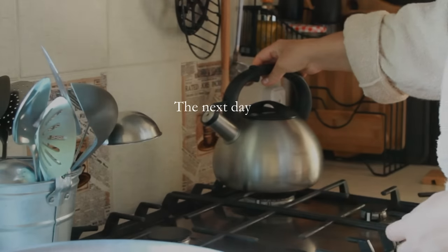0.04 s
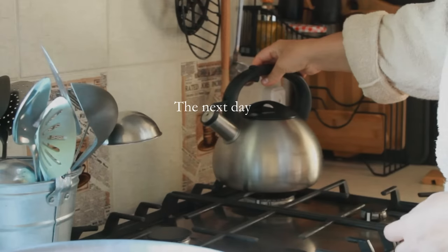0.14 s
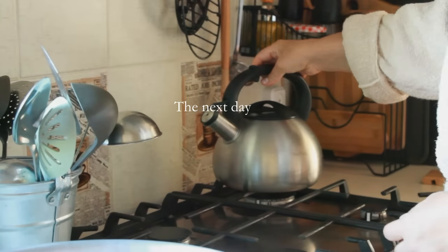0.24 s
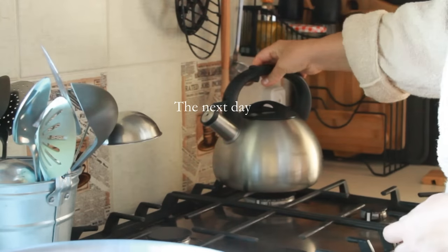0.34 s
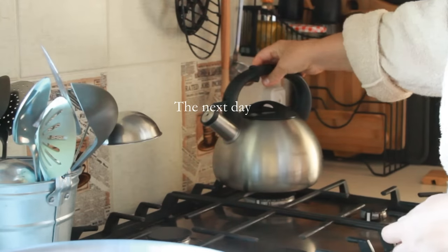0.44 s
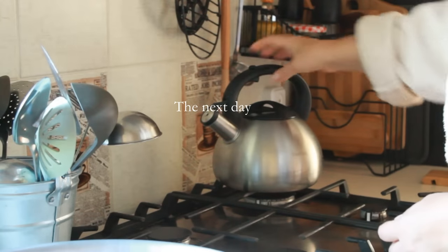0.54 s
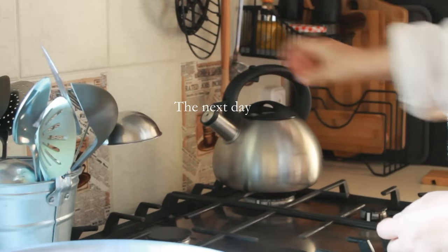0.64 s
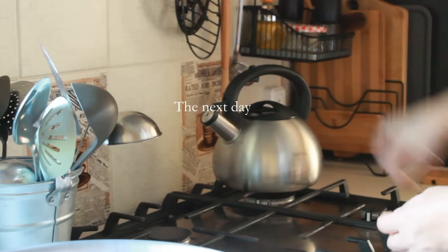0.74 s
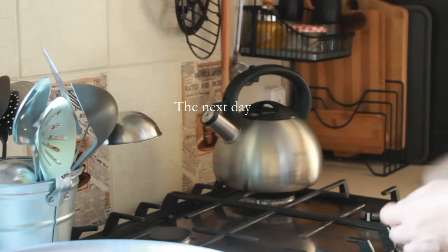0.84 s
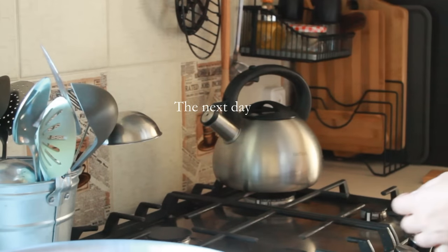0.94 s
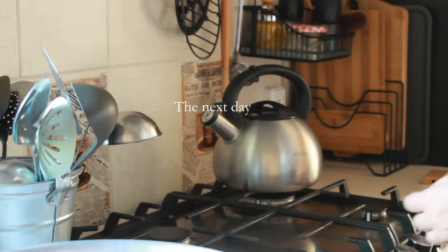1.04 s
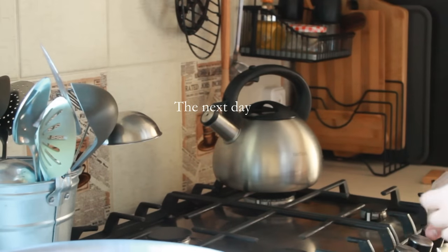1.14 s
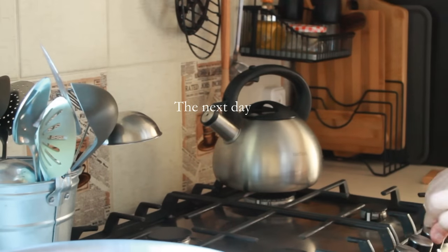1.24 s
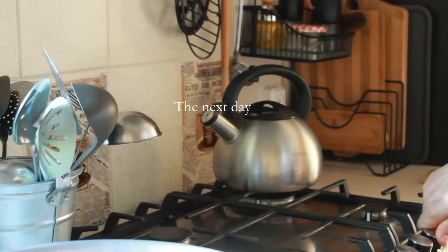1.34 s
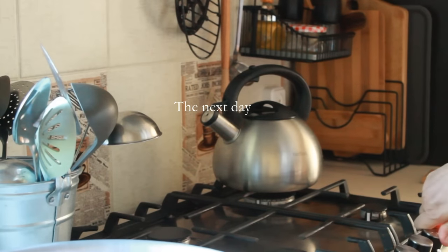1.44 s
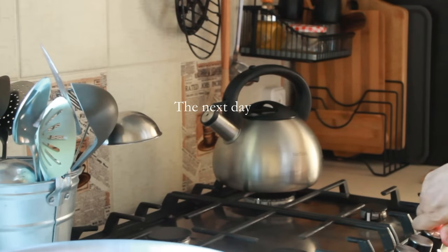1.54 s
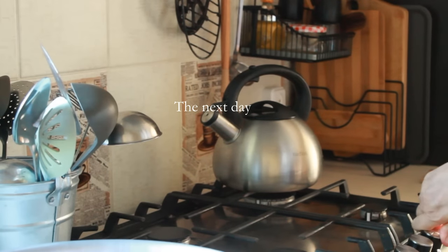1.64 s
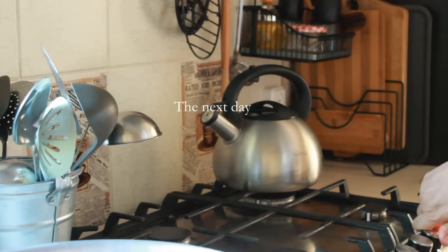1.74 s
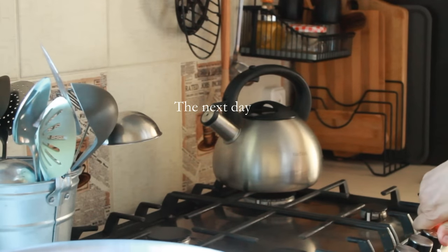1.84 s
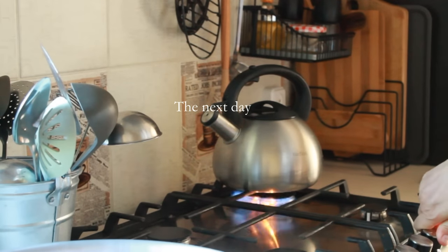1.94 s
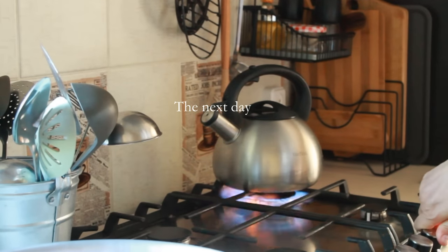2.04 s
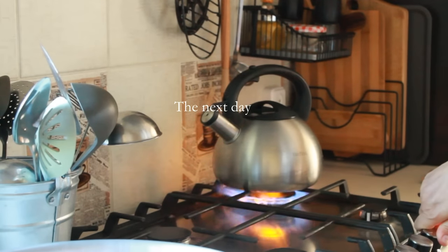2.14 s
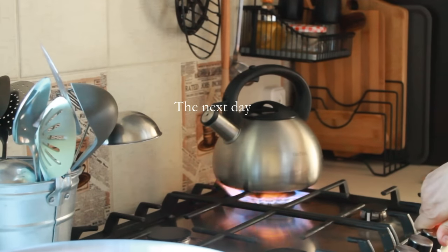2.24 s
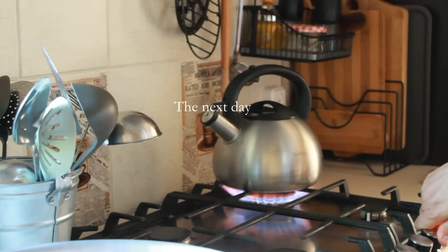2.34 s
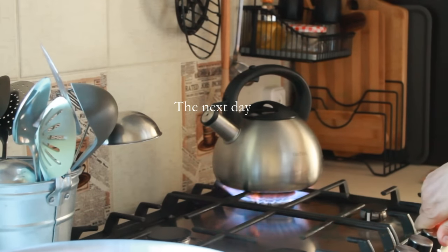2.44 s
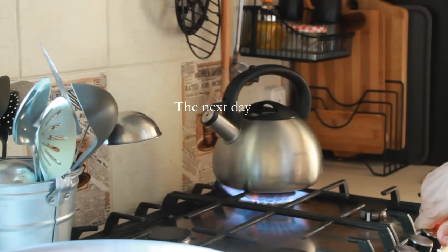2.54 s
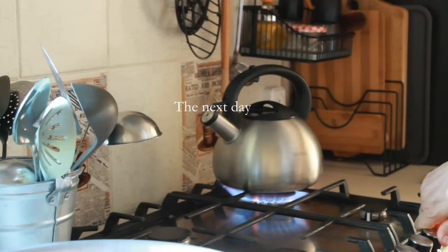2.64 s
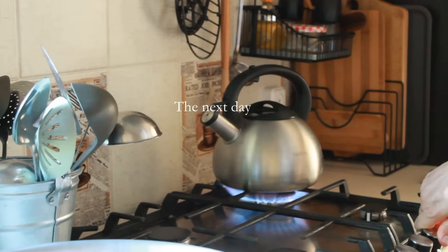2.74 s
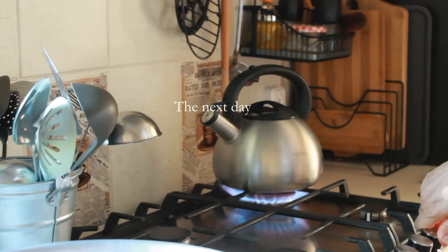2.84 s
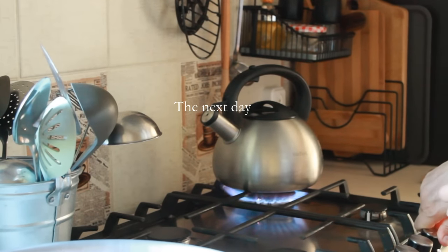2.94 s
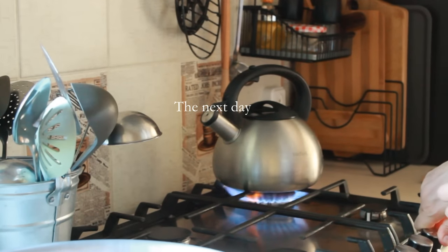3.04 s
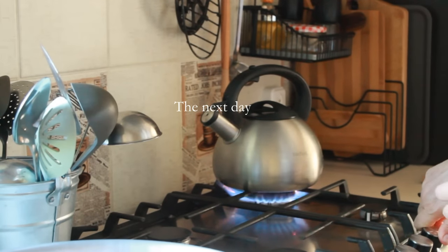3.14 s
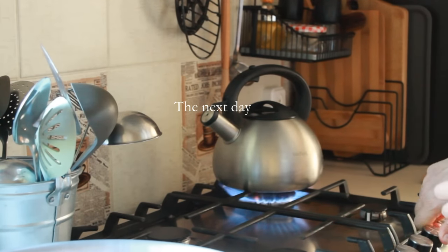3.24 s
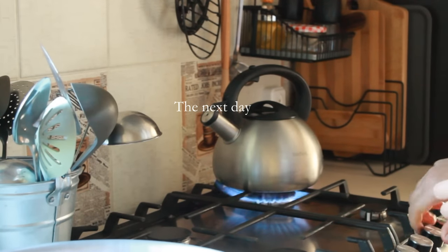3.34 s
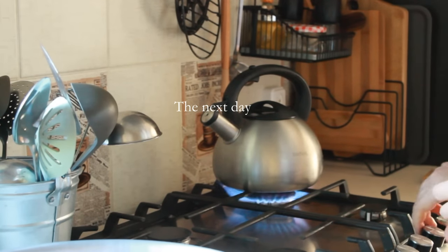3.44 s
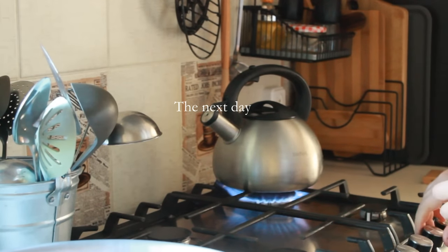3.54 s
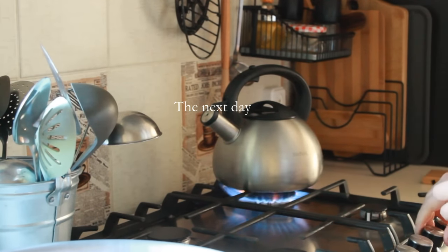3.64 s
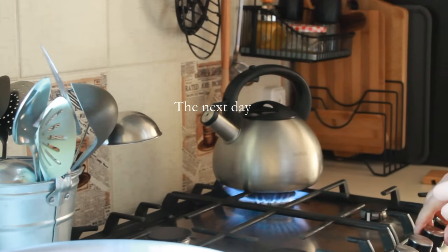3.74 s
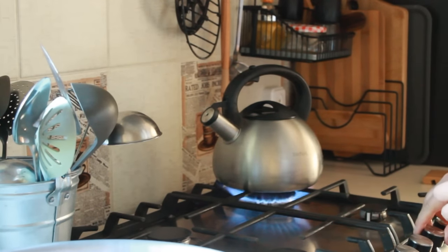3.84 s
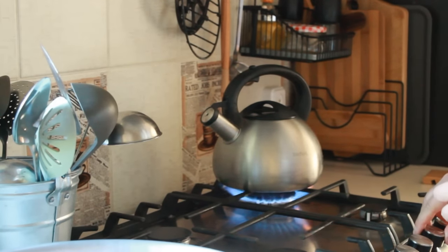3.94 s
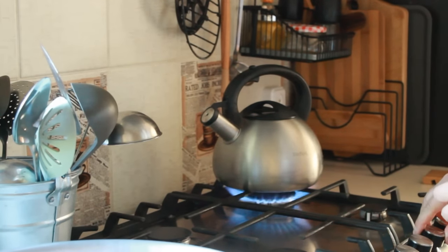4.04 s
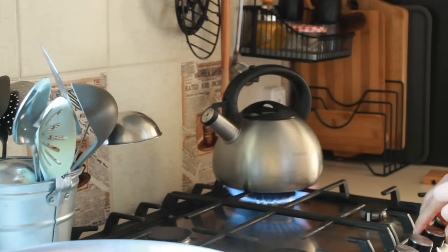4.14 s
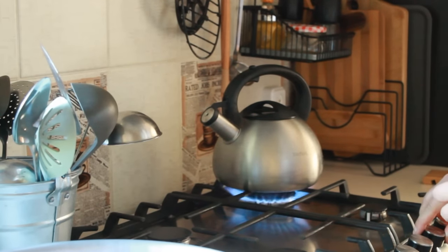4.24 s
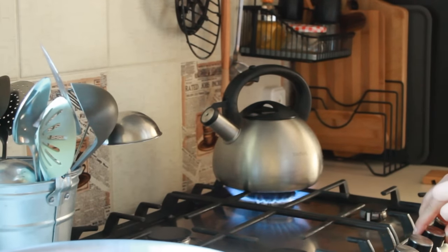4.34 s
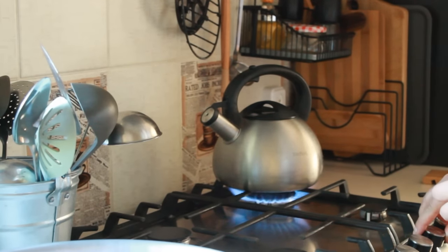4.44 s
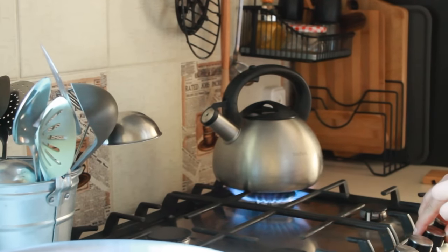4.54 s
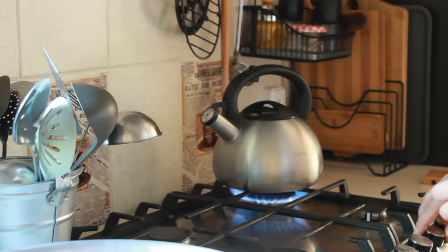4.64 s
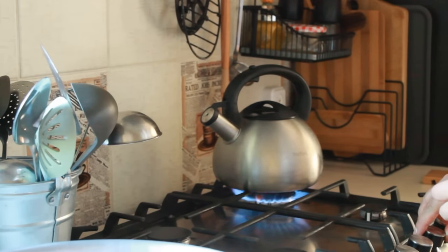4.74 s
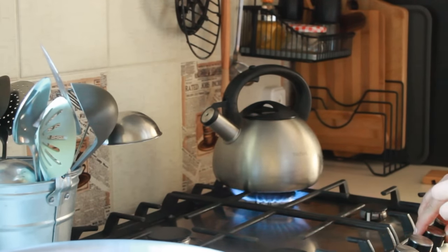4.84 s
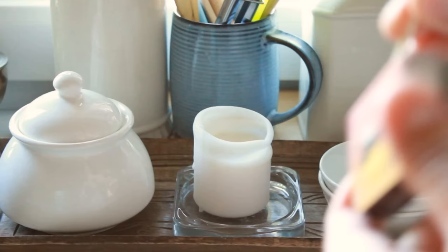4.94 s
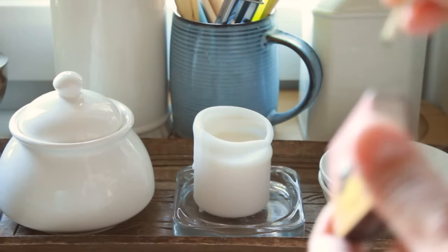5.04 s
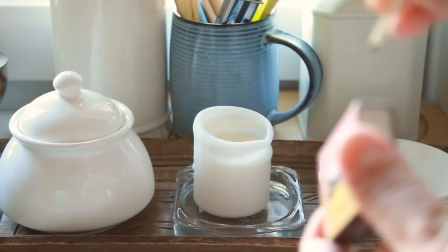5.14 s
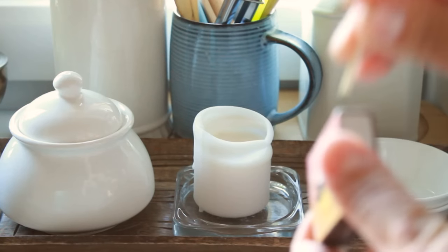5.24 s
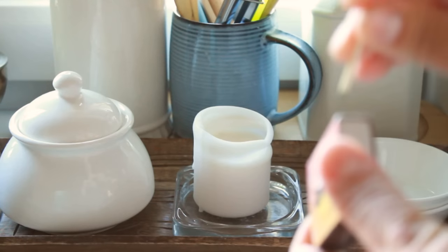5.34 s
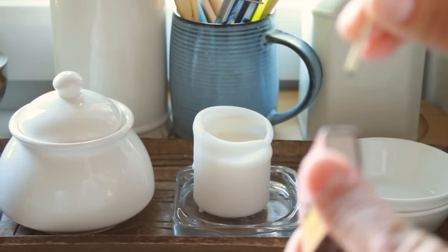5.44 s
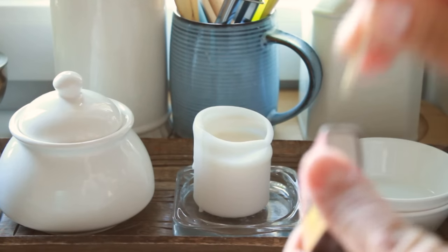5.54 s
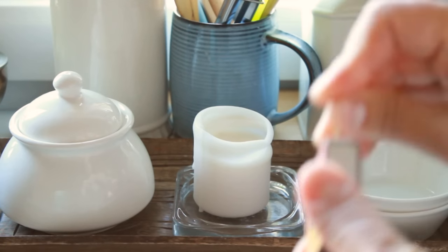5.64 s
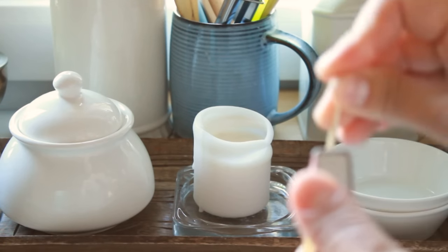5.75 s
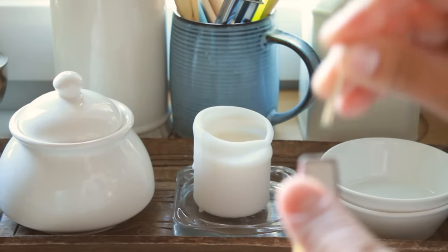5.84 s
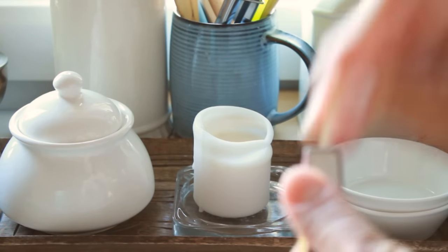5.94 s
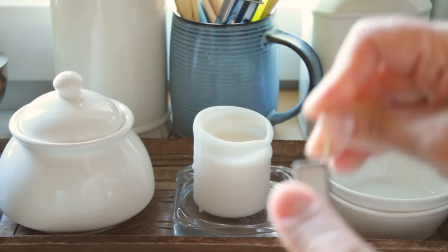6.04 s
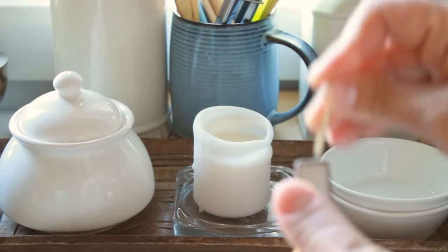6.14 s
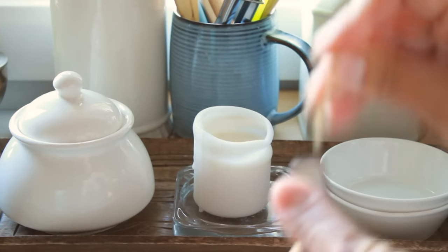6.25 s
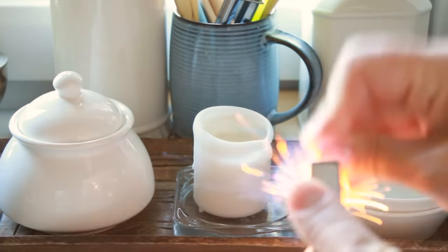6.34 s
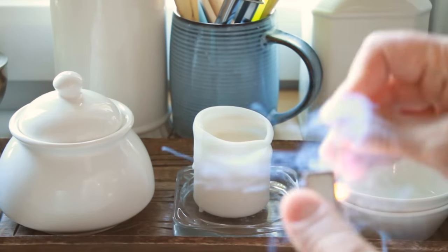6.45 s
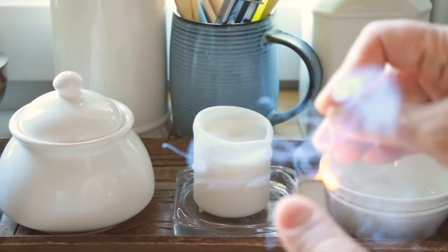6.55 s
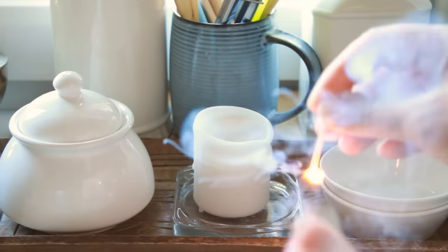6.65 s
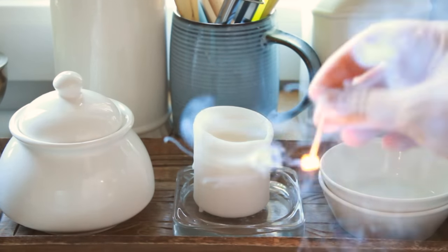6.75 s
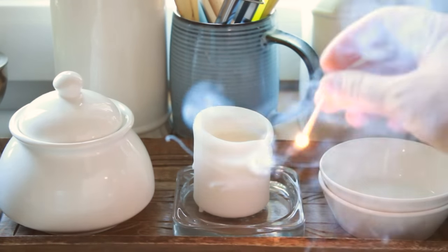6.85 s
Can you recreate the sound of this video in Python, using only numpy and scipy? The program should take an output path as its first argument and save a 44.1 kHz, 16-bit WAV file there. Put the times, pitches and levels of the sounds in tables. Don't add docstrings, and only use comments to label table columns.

```python
import sys
import numpy as np
from scipy import signal
from scipy.fft import rfft, irfft, next_fast_len
from scipy.io import wavfile
from scipy.ndimage import uniform_filter1d, map_coordinates

SR = 44100
rng = np.random.default_rng(int(sys.argv[2]) if len(sys.argv) > 2 else 0)


def bounce(signal):
    frames = np.transpose(np.atleast_2d(signal))
    limited = np.clip(frames, -1, 1)
    pcm = np.round(limited * 32767).astype(np.int16)
    wavfile.write(sys.argv[1], SR, pcm)


def gain_from_db(level_db):
    decades = np.asarray(level_db, float) / 20
    return 10 ** decades


N = 303849
TIME = np.arange(N) / SR
CUT_S = 4.981

# (spectrum of f/Hz, level/dB per Hz), overall level/dB
STOVE_AIR = [(15, -54), (25, -24), (55, -7.5), (92, -24), (138, -7.5), (378, -14), (445, -8.5),
             (651, -12.5), (726, -14), (1010, -10.5), (5570, -19.5), (16500, -35)], -68.5
# f/Hz, level/dB per Hz
TABLE_AIR = [(15, -43), (25, -12), (59, -3), (77, -14), (96, -17), (129, -5.5), (253, -6), (340, 0),
             (378, -4.5), (945, -8), (1200, -11), (7910, -21.5), (15500, -49.5)]
# t/s, level/dB
FRIDGE_HUM = [
    (4.99, -72),
    (5.86, -63),
    (6.084, -63.5),
    (6.63, -55.5),
    (6.704, -65),
    (6.89, -64),
]
# f/Hz, T60/s
WALLS = [(300, 0.83), (1300, 0.54), (3500, 0.57), (9000, 0.4), (15000, 0.27)]

# f/Hz, level/dB, nominal T60/s (capped at 0.3 s and broadened in use)
SHELL_MODES = [(2207, 2, 0.64), (2374, -5, 1.5), (2640, -3, 0.074), (2900, -14, 0.63), (3184, 3, 0.17),
               (3540, 4.5, 0.22), (3595, 9, 0.2), (4027, 5.5, 0.23), (4610, 8.5, 0.16), (5140, -13, 0.6),
               (5469, -21, 5.0), (5480, 3, 0.22), (5840, -3, 0.31), (6300, -3, 0.49), (6300, -11, 0.27),
               (6830, 1, .3), (7628, -28, 5.0), (7840, 7.5, 0.21), (8436, -22, 0.26), (8840, -0.5, 0.16),
               (9350, -1, 0.42), (10200, -14, 0.15)]
# f/Hz, level/dB per Hz
BOOM_SPECTRUM = [(24, -47), (40, -16), (234, -6), (308, -15.5), (393, -1.5), (459, -13.5), (500, -2.5),
                 (595, -12), (870, -5), (1230, -11.5), (1340, -4), (1570, -15), (2500, -19), (3250, -28),
                 (5500, -120)]
# f/Hz, level/dB per Hz
CLATTER_SPECTRUM = [(710, -35), (1200, -12), (1340, -21), (1520, -24), (7410, -15.5), (7910, -23),
                    (16000, -40)]
# t/s, level/dB over the chatter
REHITS = [
    (0.013, 1),
    (0.029, 3),
    (0.071, -2),
    (0.099, 9),
    (.137, 11),
    (.19, 7),
]

# t/s, level/dB, centre f/Hz, T60/s
RUBS = [
    (.36, -63.5, 120, .21),
    (.42, -55.5, 900, .35),
    (0.551, -62, 55, .52),
    (.605, -58.5, 5000, 0.34),
    (.97, -58, 140, 0.091),
    (1.25, -64, 130, 0.28),
    (5.3, -55, 100, .1),
    (5.87, -46.5, 170, 0.3),
    (5.98, -53, 220, .13),
]
# t/s, level/dB, centre f/Hz, T60/s
TICKS = [
    (.541, -49, 460, 0.19),
    (.547, -60, 1400, .12),
    (.704, -56.5, 4200, .06),
    (.758, -67, 8000, .015),
    (1.248, -57, 456, 0.25),
    (1.277, -67, 8500, .06),
    (1.281, -55.5, 2600, 0.13),
    (1.368, -59, 6300, .044),
    (1.38, -57.5, 500, 0.074),
    (6.7, -44, 450, .046),
]

# t/s, level/dB
GAS_FLOW = [
    (1.239, -80),
    (1.398, -75),
    (1.45, -66),
    (2.001, -62),
    (4.401, -61.5),
    (4.982, -66.5),
]
# f/Hz, width/Hz, level/dB
PORT_MODES = [(1285, 77, -5.5), (3284, 31, 2.5), (4025, 54, -6.5), (4930, 62, -3), (6560, 87, -14),
              (8790, 45, -11), (8970, 50, -17.5), (9790, 42, -17), (10800, 40, -8.5), (11170, 22, -13),
              (11470, 23, -8.5), (13100, 60, -14), (14150, 83, -17), (15300, 69, -15.5)]
# f/Hz, level/dB per Hz
JET_SPECTRUM = [(400, -45), (750, -16), (1050, -7), (1450, 4.5), (1750, -29), (2400, -29), (3300, -15),
                (5000, -21.5), (7000, -10.5), (8300, -19), (11000, -16), (12300, -21), (15500, -19.5)]
# t/s, level/dB
FLAME = [
    (2.3, -72),
    (2.75, -66),
    (3.5, -67.5),
    (3.8, -74.5),
    (4.4, -74.5),
    (4.98, -95),
]
# f/Hz, level/dB per Hz
ROAR_SPECTRUM = [(30, -24), (90, -11.5), (190, -5), (330, 0), (600, -6.5), (950, -7.5), (1500, -13.5),
                 (3000, -25), (6000, -62)]
# t/s, level/dB, width/s
PUFFS = [
    (2.055, -53, 0.019),
    (2.085, -49.5, 0.02),
    (2.155, -58, 0.018),
    (2.19, -52, 0.019),
]

# t/s, peak level/dB
SPARKS = [
    (1.63, -17),
    (1.9889, -15.5),
    (2.348, -17.5),
    (2.7076, -17.5),
    (3.0516, -18),
]
# f/Hz, level/dB per Hz
SPARK_SPECTRUM = [(290, -52.5), (500, -26), (1170, -15.5), (1330, -11.5), (1770, -16), (3900, -5),
                  (5350, -5), (7670, 1), (10100, -1), (15500, -13)]

# t/s, level/dB
TAP = (4.982, -41.5)
# f/Hz, level/dB per Hz
TAP_SPECTRUM = [(240, -44), (400, -18), (1310, -10.5), (1630, -4), (2550, -6.5), (2800, -2), (3310, -14),
                (4580, -8), (16000, -38)]
# t/s, length/s, landing level/dB, drag level/dB, drag change to the end/dB
STROKES = [
    (5.649, 0.058, -16, -29, -4.5),
    (6.013, 0.059, -25.5, -28, 1.4),
    (6.3549, .05, -24.5, -28.5, 4),
]
# f/Hz, level/dB per Hz
BOX_SPECTRUM = [(400, -37.5), (900, -27), (1200, -7), (1520, 2), (1900, -6.5), (2500, -7.5), (2950, -12),
                (3550, -18.5), (4400, -11.5), (6000, -18), (7900, -16), (9500, -26.5), (12000, -33.5),
                (16000, -30)]
# f/Hz, width/Hz
BOX_MODES = [(1224, 23), (1394, 19), (1507, 26), (1620, 25), (1787, 21), (1987, 27), (2190, 22), (2350, 20),
             (2540, 29), (2906, 24), (3390, 27), (3800, 21), (4230, 60), (4580, 42)]

# t/s, level/dB, attack/s, hold/s, fall/(dB/s)
FLARE = (6.381, -26, .005, .016, 520)
# f/Hz, level/dB per Hz
FLARE_SPECTRUM = [(59, -59), (100, -17), (427, -2.5), (903, -7.5), (1610, -14), (1790, -2), (2030, -4.5),
                  (4390, -3), (14800, -17.5), (16500, -27)]
# t/s, level/dB, attack/s, hold/s, fall/(dB/s)
SPUTTER = (6.415, -44, .01, .002, 75)
# f/Hz, level/dB per Hz
SPUTTER_SPECTRUM = [(470, -26), (800, -5), (1300, -3.5), (1430, -0.5), (2050, -0.5), (4540, -1.5),
                    (7550, -6.5), (15500, -29)]
# t/s, level/dB, width/s
SPITS = [
    (6.643, -54, .005),
    (6.755, -51, .012),
    (6.86, -50.5, .011),
]

THIN_INSTANTS = [.421, .909, 1.187, 1.304, 1.861, 2.186, 2.395, 2.929, 3.416, 3.533, 3.741, 3.858, 3.881,
                 3.904, 3.974, 4.02, 4.09, 4.113, 4.299, 4.392, 4.717, 4.856, 5.947, 6.064, 6.319, 6.574]


def unit(x):
    return x / np.sqrt(np.mean(x ** 2) + 1e-20)


def along(points, hz):
    f, v = np.transpose(points)
    return np.interp(np.log(hz + 1), np.log(f + 1), v)


def gain(rows):
    s, db = np.transpose(rows)
    return gain_from_db(np.interp(TIME, s, db)) * (TIME >= s[0]) * (TIME <= s[-1])


def envelope(start_s, db, attack_s, hold_s, fall):
    t = TIME - start_s
    decay = gain_from_db(db - fall * np.maximum(t - attack_s - hold_s, 0))
    return decay * np.clip(t / attack_s, 0, 1)


def swells(rows):
    return sum(gain_from_db(db) * np.exp(-((TIME - s) / width) ** 2) for s, db, width in rows)


def wobble(rate):
    knots = rng.standard_normal(int(N * rate / SR) + 4)
    return map_coordinates(knots, [TIME * rate])


def filtered(x, response):
    m = next_fast_len(len(x) + SR // 2)
    return irfft(rfft(x, m) * response(np.fft.rfftfreq(m, 1 / SR)), m)[:len(x)]


def causal(spectrum):
    cepstrum = irfft(np.log(gain_from_db(along(spectrum, np.fft.rfftfreq(4096, 1 / SR))) + 1e-6))
    cepstrum[1:2048] *= 2
    cepstrum[2049:] = 0
    kernel = irfft(np.exp(rfft(cepstrum)))[:2048]
    return kernel / np.linalg.norm(kernel)


def resonances(peaks, widen):
    def response(f):
        total = 0
        for k, (centre, width, db) in enumerate(peaks):
            damping = 1j * f * widen * width
            total = total + (-1) ** k * gain_from_db(db) * damping / (centre * centre - f * f + damping)
        return total
    return response


def noise(spectrum):
    return unit(filtered(rng.standard_normal(N), lambda hz: gain_from_db(along(spectrum, hz))))


def grit(per_s, spread_db):
    slips = (rng.random(N) < per_s / SR) * rng.standard_normal(N)
    slips = slips * gain_from_db(spread_db * rng.exponential(size=N))
    power = np.abs(uniform_filter1d(slips ** 2, size=900))
    return slips / np.sqrt(power + .1 * power.mean())


def room(x, shorter=0.8):
    hz, t, z = signal.stft(rng.standard_normal(SR // 2), SR, nperseg=256)
    decay = gain_from_db(-60 * t / (shorter * along(WALLS, hz))[:, None])
    tail = signal.istft(z * decay, SR, nperseg=256)[1]
    delayed = np.pad(x, (120, 0))
    return signal.fftconvolve(delayed, tail / np.linalg.norm(tail))[:len(x)]


def air():
    hum_hz = 64.7 + 2.1 * wobble(8.6)
    hum = np.sqrt(2) * np.sin(2 * np.pi * np.cumsum(hum_hz) / SR)
    stove_spectrum, stove_db = STOVE_AIR
    stove = gain_from_db(stove_db + 0.38 * wobble(3.98)) * noise(stove_spectrum) * (TIME < CUT_S)
    table_db = -62 + 1.74 * (TIME - CUT_S)
    table = gain_from_db(table_db + 3.0 + 0.9 * wobble(8)) * noise(TABLE_AIR) * (TIME >= CUT_S)
    return stove + table + gain(FRIDGE_HUM) * hum


def kettle():
    land_s, still_s = 0.0102, 0.2
    landing = envelope(land_s, -33.5, 0.0017, 0.0047, 460)
    chatter = envelope(land_s, -51.5, .001, 0.14, 200)
    contact = landing + chatter
    boom = envelope(land_s, -42, 0.007, 0.051, 48)
    boom = boom * gain_from_db(-270 * np.maximum(TIME - still_s, 0))
    strikes = 1 + sum(gain_from_db(db) * np.exp(-np.abs(TIME - s) / 0.0048) * (TIME > s) for s, db in REHITS)
    shell = resonances([(hz, 2.2 / min(t60, .3), db) for hz, db, t60 in SHELL_MODES], widen=4.)
    force = grit(2500, spread_db=1.0)[:SR]
    ring = filtered(force * (contact * strikes)[:SR], shell) / np.std(filtered(force, shell))
    clatter = gain_from_db(-9.5) * contact * strikes * noise(CLATTER_SPECTRUM)
    dry = (clatter + boom * noise(BOOM_SPECTRUM))[:SR] + gain_from_db(-7.0) * ring
    return np.pad(dry + gain_from_db(-3.5) * room(dry), (0, N - SR))


def hands():
    out, t = np.zeros(N), np.arange(SR // 2) / SR
    touches = [(*r, 0.086) for r in RUBS] + [(*r, 0.036) for r in TICKS]
    for s, db, hz, t60, rise in touches:
        band = resonances([(hz, hz, 0)], widen=1.1)
        puff = unit(filtered(filtered(rng.standard_normal(len(t)), band), band))
        shape = gain_from_db(db - 60 * t / t60) * (1 - np.exp(-t / (rise * t60)))
        start = round(s * SR)
        out[start:][:len(t)] += (shape * puff)[:N - start]
    return out + gain_from_db(-4) * room(out)


def burner():
    light_s, hottest_s = 1.995, .22
    ports = unit(filtered(rng.standard_normal(N), resonances(PORT_MODES, widen=2.6)))
    jet = gain_from_db(1.0) * ports + gain_from_db(-1.5) * noise(JET_SPECTRUM)
    heat = np.maximum(TIME - light_s, 0) / hottest_s
    pitch_lift = .14 * (heat * np.exp(1 - heat)) ** 3
    jet = map_coordinates(jet, [np.cumsum(1 + pitch_lift + .003 * wobble(12))], order=5)
    flow = gain(GAS_FLOW) * gain_from_db(0.5 * wobble(7) + 0.77 * wobble(30))
    roar = unit(noise(ROAR_SPECTRUM) * gain_from_db(2.5 * wobble(40) + .8 * wobble(7)))
    whoosh = envelope(light_s, -52.5, .01, 0.21, 210)
    flame = whoosh + swells(PUFFS) + gain(FLAME)
    return flow * jet + flame * roar


def igniter():
    out, t = np.zeros(N), np.arange(SR // 2) / SR
    for s, db in SPARKS:
        pulse = (t == 0) * 1.
        cluster = (t / .001) ** 2 * np.exp(2 - 2 * t / .001) + .14 * gain_from_db(-60 * t / .08)
        echoes = pulse + cluster * rng.standard_normal(len(t)) + gain_from_db(19.0) * room(pulse)
        snap = signal.fftconvolve(echoes, causal(SPARK_SPECTRUM))[:len(t)]
        out[round((s + .0007) * SR):][:len(t)] += gain_from_db(db - 4.5) * snap
    return out


def below(x, hz):
    return filtered(x, lambda f: 1 / (1 + (f / hz) ** 6))


def box(force):
    modes = resonances([(hz, width, 0) for hz, width in BOX_MODES], widen=.8)
    body = signal.fftconvolve(force, causal(BOX_SPECTRUM))[:len(force)]
    return filtered(body, lambda f: 1 + np.abs(modes(f)))


def match():
    out = np.zeros(N)
    half = SR // 2
    slips = grit(5000, spread_db=1.5) * gain_from_db(1.8 * wobble(150))
    for s, length, land_db, drag_db, change_db in STROKES:
        span = slice(round(s * SR), round(s * SR) + half)
        knock = envelope(s, land_db, .0002, .002, 710)
        progress = np.clip((TIME - s) / length, 0, 1)
        drag = envelope(s, drag_db, 0.00027, length, 2000) * gain_from_db(change_db * progress)
        deep = gain_from_db(-3.5 + (drag_db + change_db * progress + 29.5))
        low = (slips * (knock + deep * drag))[span]
        low[1] = gain_from_db(land_db + 11)
        upper = box((slips * (gain_from_db(-9.5) * knock + drag))[span])
        middle = below(upper, 3640) - below(upper, 2090)
        high = upper - below(upper, 3300)
        dry = gain_from_db(0.56) * below(box(low), 1620) + gain_from_db(4.5) * middle
        dry += gain_from_db(-1.0 + 4.5 * progress[span]) * high
        out[span] += dry + gain_from_db(-7.0) * room(dry, shorter=0.65)
    tap_s, tap_db = TAP
    tap = gain_from_db(tap_db - 60 * TIME[:half] / 0.032) * rng.standard_normal(half)
    tap = signal.fftconvolve(tap, causal(TAP_SPECTRUM))[:half]
    out[round(tap_s * SR):][:half] += tap + gain_from_db(1.5) * room(tap, shorter=0.6)
    return out


def fire():
    return rng.standard_normal(N) + .5 * grit(1200, spread_db=2.)


def flare():
    burst = signal.fftconvolve(fire() * envelope(*FLARE), causal(FLARE_SPECTRUM))[:N]
    burn_out = gain_from_db(-120 * np.maximum(TIME - 6.66, 0))
    burning = envelope(*SPUTTER) * burn_out + swells(SPITS)
    sputter = signal.fftconvolve(fire() * burning, causal(SPUTTER_SPECTRUM))[:N]
    return burst + sputter + gain_from_db(-7) * room(burst + sputter, shorter=0.31)


def scene():
    return (air() + kettle() + hands() + burner() + igniter() + match() + flare())[None]


def thinned(x):
    lead, window = 890, signal.get_window("cosine", 2048)
    hz, t, z = signal.stft(np.pad(x, (lead, 0)), SR, window, nperseg=2048)
    top_hz = 15750
    z[hz > top_hz] *= gain_from_db(-36)
    for s in THIN_INSTANTS:
        kept = .09 if 2.6 < s < CUT_S else .26
        frame = round((s * SR + lead) / 1024)
        size = np.abs(z[:, frame]) * (hz < top_hz)
        prominence = size / (uniform_filter1d(size, size=100) + 1e-9) ** .45
        z[:, frame] *= prominence > np.quantile(prominence, 1 - kept)
    return signal.istft(z, SR, window, nperseg=2048)[1][lead:lead + N]


def top_cut(x):
    return signal.sosfilt(signal.butter(12, 16800, fs=SR, output="sos"), x)


def record(dry):
    hiss = rng.standard_normal(N) * np.where(TIME < CUT_S, gain_from_db(-103), gain_from_db(-70.5))
    x = filtered(dry[0] + hiss, lambda f: (1j * f / (35 + 1j * f)) ** 2)
    mix = thinned(x)[None]
    return top_cut(mix)


dry = scene()
out = record(dry)
bounce(out)
```